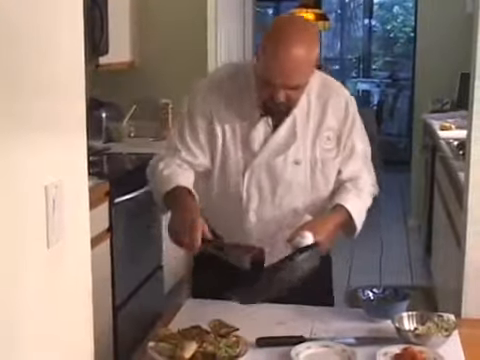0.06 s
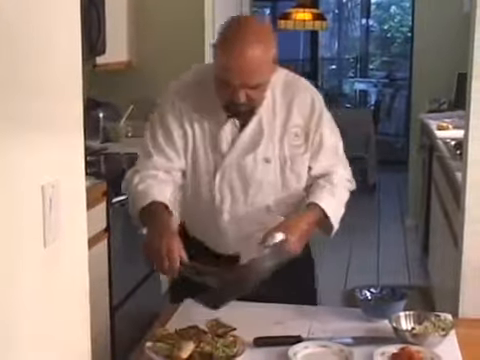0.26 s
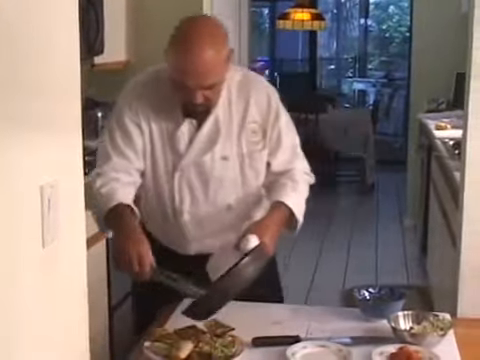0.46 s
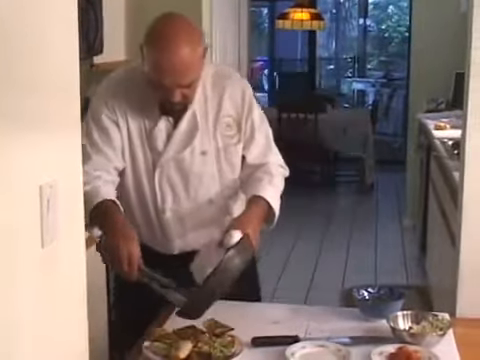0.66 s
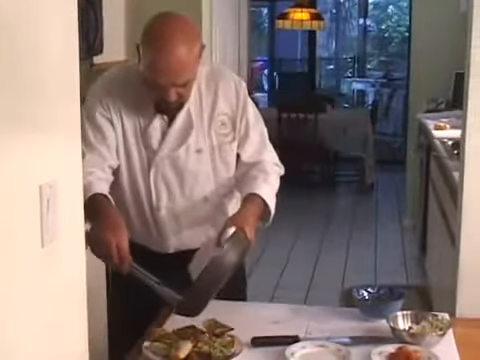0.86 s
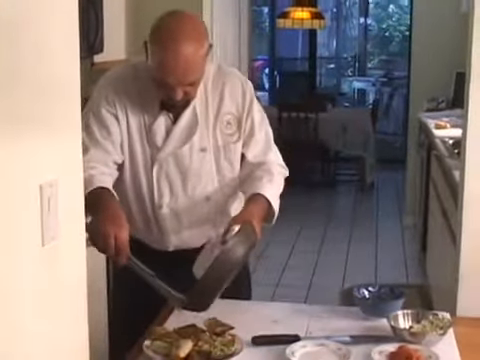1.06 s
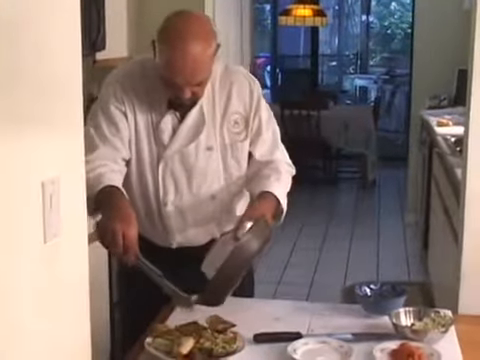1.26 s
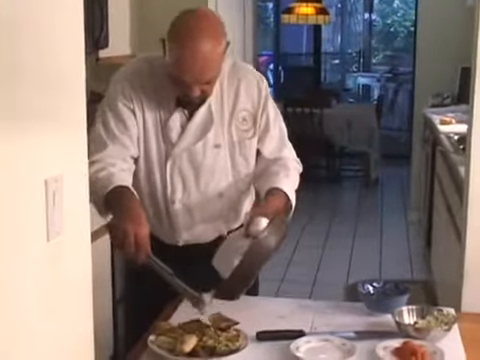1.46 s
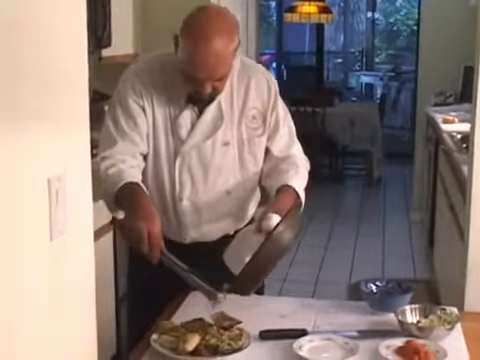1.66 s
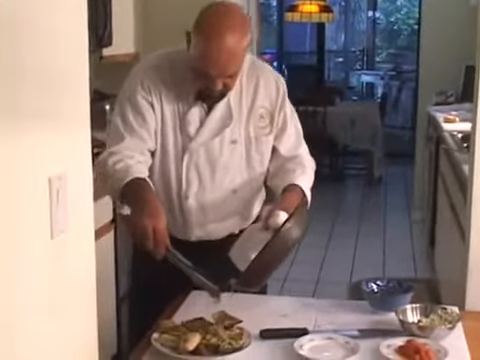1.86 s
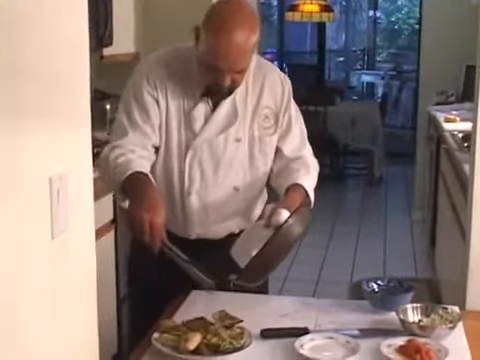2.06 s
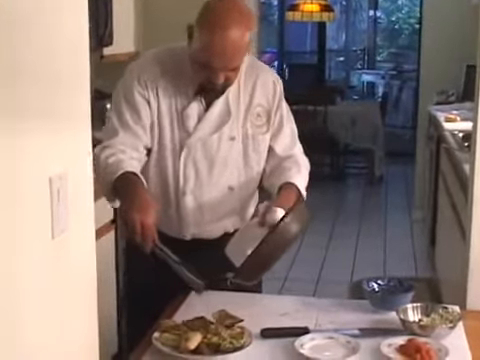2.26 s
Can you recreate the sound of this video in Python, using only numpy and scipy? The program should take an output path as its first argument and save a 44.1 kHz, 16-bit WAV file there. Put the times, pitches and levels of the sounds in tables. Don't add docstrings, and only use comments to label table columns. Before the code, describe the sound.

Metal tongs work in a small steel pan. Faint fridge hum and camcorder hiss run throughout. At about 0.25 s a hard clank rings and is quickly damped, followed by chattering, scraping and squeaks until 0.45. A softer, duller knock comes at 0.65, then a thin sliding squeal near 0.85. Sharp clicks sound around 1.1-1.3; faint rubbing and dry ticks continue from 1.4 to 2.3, with short kitchen echo.

```python
import sys
import numpy as np
from scipy import signal
from scipy.fft import rfft, irfft, next_fast_len
from scipy.io import wavfile
from scipy.ndimage import map_coordinates

SR = 44100
rng = np.random.default_rng(int(sys.argv[2]) if len(sys.argv) > 2 else 0)


def invert_db(x):
    u = np.asarray(x, float) / 20
    return 10 ** u


def persist_wave(psi):
    counts = np.round(np.clip(psi, -1, 1) * 32767).astype(np.int16)
    wavfile.write(sys.argv[1], SR, np.atleast_2d(counts).T)


N = 101429


def unit(x):
    return x / np.sqrt(np.mean(x ** 2) + 1e-20)


def along(points, hz):
    f, value = np.transpose(points)
    return np.interp(np.log(hz + 1), np.log(f + 1), value)


def filtered(x, response):
    size = next_fast_len(len(x) + 8192)
    spectrum = rfft(x, size) * response(np.fft.rfftfreq(size, 1 / SR))
    return irfft(spectrum, size)[:len(x)]


def peak(f, hz, width_hz):
    return 1j * f * width_hz / (hz * hz - f * f + 1j * f * width_hz)


def wobble(rate):
    places = np.arange(N) * rate / SR
    return map_coordinates(rng.standard_normal(int(N * rate / SR) + 4), [places])


def add(track, s, sound):
    part = track[round(s * SR):][:len(sound)]
    part += sound[:len(part)]


def air():
    # f/Hz, level per Hz/dB
    hiss_colour = [(15, -5.5), (60, -14), (200, -14), (400, -13.5), (1000, -19.5), (4000, -26.5),
                   (9000, -32.5), (14900, -36.5)]
    # f/Hz, level/dB, width/Hz
    hum_lines = [(118.4, -74.5, 4), (156, -81, 6), (196, -81, 8), (59.2, -83, 5), (3060, -88, 60)]
    hiss_db, patchy_db, fuzz_share = -67.5, -0.16, .4
    t = np.arange(N) / SR
    hiss = unit(filtered(rng.standard_normal(N), lambda f: invert_db(along(hiss_colour, f))))
    out = invert_db(hiss_db + patchy_db * wobble(6.2)) * hiss
    for hz, db, width in hum_lines:
        fuzz = unit(filtered(rng.standard_normal(N), lambda f: peak(f, hz, width)))
        steady = (hz < 300) * np.sqrt(2) * np.sin(2 * np.pi * hz * t)
        out += invert_db(db) * (fuzz_share * fuzz + steady)
    return out


def drag():
    # t/s, pressure/dB, rasp over ring/dB
    strokes = [(.2, -89.5, -2), (.24, -93, 19), (0.259, -53, 10), (.36, -62, 8), (0.408, -62, 9),
               (.47, -68, 0.5), (0.622, -81.5, -4), (.66, -63, 11), (.76, -65, 4), (.86, -75, 11),
               (.96, -82, 13), (1.15, -82.5, 5.5), (1.4, -71.5, -2.5), (1.6, -76, 4), (1.68, -86.5, 4),
               (1.8, -69.5, -1), (2.07, -71.5, 1), (2.15, -79.5, 4.5)]
    # f/Hz, width/Hz, level/dB
    resonances = [(842, 69, -5.5), (973, 33.4, 3.5), (1058, 84, -6), (1645, 70, -14), (1864, 380, -19),
                  (2760, 580, -14), (3295, 180, -23.5), (4060, 38, -13), (4430, 89, -19.5), (5800, 81, -16),
                  (6320, 170, -33), (8850, 160, -40.5), (9800, 720, -43), (11200, 360, -27)]
    # f/Hz, level/dB
    grit = [(200, -27), (600, -18), (1500, -15), (3000, -25), (4500, -23.5), (6500, -26.5), (10000, -33.5),
            (14500, -55.5)]
    slips_per_s, slip_spread_db = 3000, 2
    smooth_share = 1.5
    bright_hz, uneven_db = 1300, 2
    s, db, rasp_db = np.transpose(strokes)
    t = np.arange(N) / SR

    happens = rng.random(N) < slips_per_s / SR
    slips = happens * invert_db(slip_spread_db * rng.exponential(size=N)) * rng.standard_normal(N)
    force = unit(slips) + smooth_share * rng.standard_normal(N)

    def pan(f, bright):
        return sum((-1) ** k * invert_db(level) * peak(f, hz, width)
                   for k, (hz, width, level) in enumerate(resonances) if (hz > bright_hz) == bright)

    body = filtered(force, lambda f: pan(f, False))
    rasp = filtered(force, lambda f: pan(f, True) + invert_db(along(grit, f)))
    rasp = rasp * invert_db(np.interp(t, s, rasp_db) + 1.2 * uneven_db * wobble(19.97))
    rubbing = body * invert_db(uneven_db * wobble(45.2)) + rasp
    return invert_db(np.interp(t, s, db)) * rubbing / np.std(body)


def ticks():
    # t/s, peak level/dB, f/Hz, length/cycles
    clicks = [(0.222, -49, 7500, 5.1), (.5585, -53, 7500, 2.8), (.6033, -42, 8400, 2.7),
              (1.12, -29, 5000, 0.4), (1.15, -51, 10900, 2.5), (1.188, -36, 3520, 0.53),
              (1.302, -49, 3500, .8), (1.308, -51, 4600, 3.7), (1.66, -49.5, 10740, 2.9),
              (1.71, -58, 4270, 12), (1.766, -52, 2200, 1.6), (1.796, -47, 3000, 1.3),
              (1.838, -51, 11000, 2.7), (1.866, -52, 2020, 2.8), (1.879, -52, 10000, 2.5),
              (1.901, -47, 10000, 1.5), (1.905, -47.5, 4300, 1.9), (1.939, -60, 10000, 2.5),
              (1.96, -52, 8500, 2.8), (2.028, -48.5, 8800, 3), (2.032, -37, 6000, 0.73),
              (2.08, -54, 2120, 2.1), (2.206, -48, 8400, 4.2), (2.211, -54, 10000, 3.4),
              (2.288, -50, 9700, 3.8), (2.294, -52, 9770, 4)]
    spread_s, scatter, trim_db = .007, .3, -6.5
    out, t = np.zeros(N), np.arange(400) / SR
    for (s, db, hz, cycles), draw in zip(clicks, rng.random((len(clicks), 3, 2))):
        for k, (late, tone) in enumerate(draw):
            follower = k > 0
            pitch = hz * (1 + scatter * (2 * tone - 1) * follower)
            fade = np.exp(-t * pitch / cycles) * (1 - np.exp(-t * pitch * 2))
            snap = np.sin(2 * np.pi * pitch * t) * fade
            add(out, s + spread_s * (late - .3) * follower, invert_db(db + trim_db) * snap)
    return out


def ring(modes, t):
    middle_hz, middle_late_s = 1200, .0025
    loose_hz = 1900
    total = 0
    for (hz, db, t60), start in zip(modes, rng.random(len(modes))):
        turns = hz * (t - middle_late_s * (hz > middle_hz)) + start * (hz > loose_hz)
        total = total + invert_db(db - 60 * np.maximum(t, 0) / t60) * np.cos(2 * np.pi * turns)
    return total / 2


def crack(t, db):
    # f/Hz, level/dB
    crack_colour = [(300, 12.5), (1500, 7), (4000, -4), (8000, -12), (14000, -37.5)]
    crack_t60 = 0.056
    noise = filtered(rng.standard_normal(len(t)), lambda f: invert_db(along(crack_colour, f)))
    return unit(noise) * invert_db(db - 60 * np.maximum(t, 0) / crack_t60)


def knocks():
    # t/s, peak level/dB, build-up/s, crack level/dB
    blows = [
        (.2455, -13, .0034, -23),
        (0.6475, -20.5, 0.002433, -35),
    ]
    # f/Hz, level/dB, t60/s
    rim = [(863, -10, .25), (962, 0, .3), (1060, -11.5, .2), (1670, -8, .16), (1830, -5.5, .13),
           (3335, -15, .11), (2735, -17.5, .1), (430, -30, .03), (1300, -24, .07), (1756, -16, .06),
           (2175, -21, .06), (4400, -24, .05), (4054, -28, .05), (8000, -32, .025)]
    # f/Hz, level/dB, t60/s
    floor = [(464, -12.5, 0.035), (900, -9, 0.16), (949, 2, 0.045), (1046, -0.5, 0.032),
             (1609, -4.5, 0.027), (1912, -14, 0.064), (2250, -26, 0.056), (2766, -12, 0.053),
             (3220, -23.5, 0.072), (4680, -37, 0.094), (5900, -22.5, 0.045), (6940, -28, 0.039),
             (8300, -26, 0.084), (11660, -30.5, 0.033)]
    # t/s, ring level/dB, crack level/dB
    taps = [
        (.2383, -41, -41),
        (.2735, -46, -52),
        (.291, -46, -50),
        (.327, -47, -52),
        (.372, -48, -48),
        (.68, -50, -52),
    ]
    grip_s, grip_t60 = .013, .029
    pan_low_hz = 307
    out = np.zeros(N)
    for (s, db, build, crack_db), modes in zip(blows, (rim, floor)):
        t = np.arange(SR // 3) / SR - build
        rise = np.clip(1 + t / build, 0, 1) ** 0.18
        grip = invert_db(-60 * np.maximum(t - grip_s, 0) / grip_t60)
        add(out, s - build, rise * (invert_db(db) * ring(modes, t) * grip + crack(t, crack_db)))
    t = np.arange(SR // 6) / SR
    for (s, db, crack_db), tone in zip(taps, rng.normal(0, 3, (len(taps), len(rim)))):
        modes = [(hz, level + change, t60) for (hz, level, t60), change in zip(rim, tone)]
        add(out, s, (invert_db(db) * ring(modes, t) + crack(t, crack_db)) * (1 - np.exp(-t / 0.00022)))
    return filtered(out, lambda f: (1j * f / (pan_low_hz + 1j * f)) ** 3)


def squeaks():
    # t/s, length/s,
    # f/Hz, level/dB, width/Hz
    swells = [(.272, .018, 940, -41, 60), (.272, .007, 1800, -42, 90), (.299, .014, 985, -37, 60),
              (.315, .006, 960, -46, 60), (.323, .009, 985, -43, 60), (.334, .008, 900, -48, 60),
              (.35, .008, 900, -48, 60), (.3705, .03, 985, -37.5, 30), (.37, .012, 1850, -49, 300),
              (.398, .028, 1812, -44, 30), (.396, .012, 1000, -45, 60), (.41, .011, 970, -45, 60),
              (.428, .028, 975, -53, 60), (.654, .011, 975, -39, 60), (.674, .01, 1600, -50, 90),
              (.679, .016, 975, -45, 60), (.701, .017, 975, -45, 60), (.726, .018, 975, -53, 60),
              (.752, .016, 950, -49, 90), (.955, .028, 1928, -65, 30)]
    # t/s, length/s, f/Hz, level/dB, width/Hz
    chirps = [(.29, .05, 3340, -52, 110), (.29, .04, 2750, -51, 150), (.33, .09, 2800, -58, 250),
              (.262, .022, 4430, -52, 150), (.372, .022, 5640, -60, 150), (.38, .04, 4150, -60, 120),
              (.565, .032, 5400, -66, 2000), (.566, .03, 9600, -71, 900), (.565, .035, 9000, -68, 9000),
              (.2435, .014, 11000, -48, 7000), (.645, .012, 10500, -49, 8000), (.27, .16, 480, -58, 500),
              (.66, .06, 4100, -62, 150), (.675, .015, 2750, -56, 150), (.708, .016, 6100, -59, 900),
              (.726, .01, 6400, -59, 600), (.738, .013, 6200, -60, 900), (.73, .07, 720, -62, 350),
              (.78, .04, 1150, -62, 300), (.815, .06, 1500, -62, 500), (.8, .04, 4500, -69, 900),
              (.845, .05, 6000, -65, 1800), (.868, .012, 6000, -64, 5000), (.9, .09, 6200, -70, 2000),
              (1.38, .2, 3200, -80, 400), (1.435, .025, 10000, -76, 1500), (1.545, .075, 1750, -72, 30),
              (1.84, .12, 5000, -75, 2500), (2.05, .05, 2300, -76, 900)]
    trim_db, pure_share = -1.6, 2.5
    rise, fall = 0.12, 0.35
    out, events = np.zeros(N), swells + chirps
    for (s, length, hz, db, width), noise in zip(events, rng.standard_normal((len(events), 12000))):
        t = np.arange(round(length * SR)) / SR
        tone = unit(filtered(noise, lambda f: peak(f, hz, width) ** 2)[-len(t):])
        tone = tone + pure_share * (width < 100) * np.sin(2 * np.pi * hz * t)
        shape = np.clip(np.minimum(t / (rise * length), (length - t) / (fall * length)), 0, 1)
        add(out, s, invert_db(db + trim_db) * unit(tone) * shape)
    return out


def thud():
    # t/s, level/dB, width/s
    pushes = [
        (0.244, -23.5, 0.00066),
        (0.646, -44.5, 0.00046),
    ]
    t = np.arange(N) / SR
    return sum(invert_db(db) * np.exp(-((t - s) / width) ** 2) for s, db, width in pushes)


def squeal():
    # t/s, f/Hz, level/dB
    path = [
        (.824, 1800, -76),
        (.834, 1860, -58),
        (.848, 1950, -60),
        (.857, 1880, -54),
        (.864, 1910, -59),
        (.874, 1925, -52),
        (.893, 1915, -58),
        (.899, 1920, -68),
        (.93, 1925, -80),
    ]
    waver_hz, waver_db = 45, 2
    s, hz, db = np.transpose(path)
    t = np.arange(N) / SR
    turns = np.cumsum(np.interp(t, s, hz) + waver_hz * wobble(160)) / SR
    level = invert_db(np.interp(t, s, db, -150, -150) + waver_db * wobble(160))
    return np.sqrt(2) * level * np.sin(2 * np.pi * turns)


def kitchen(x):
    # f/Hz, t60/s
    echo_times = [(150, 0.74), (1000, 0.41), (4000, 0.44), (12000, 0.28)]
    room_db, gap_s = -17, 0.0067
    hz, t, z = signal.stft(rng.standard_normal(SR // 2), SR, nperseg=256)
    fade = invert_db(-60 * t / along(echo_times, hz)[:, None])
    tail = signal.istft(z * fade, SR, nperseg=256)[1]
    delayed = np.pad(x, (round(gap_s * SR), 0))
    return invert_db(room_db) * signal.fftconvolve(delayed, tail / np.linalg.norm(tail))[:N]


def scene():
    near = drag() + ticks() + knocks() + squeaks() + squeal()
    return (near + kitchen(near) + thud() + air())[None]


def roll_off(x):
    return signal.sosfilt(signal.butter(12, 14990, fs=SR, output="sos"), x)


def record(dry):
    top_hz = 14780
    limited = filtered(dry[0], lambda f: 1 / (1 + (f / top_hz) ** 120))
    return roll_off(limited[None])


dry = scene()
out = record(dry)
persist_wave(out)
```